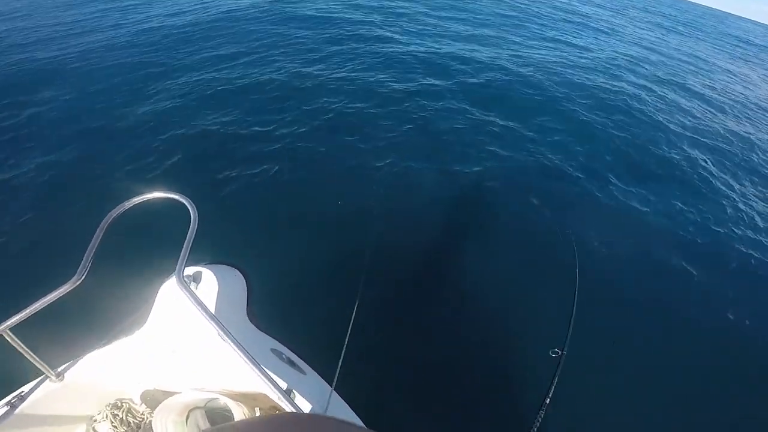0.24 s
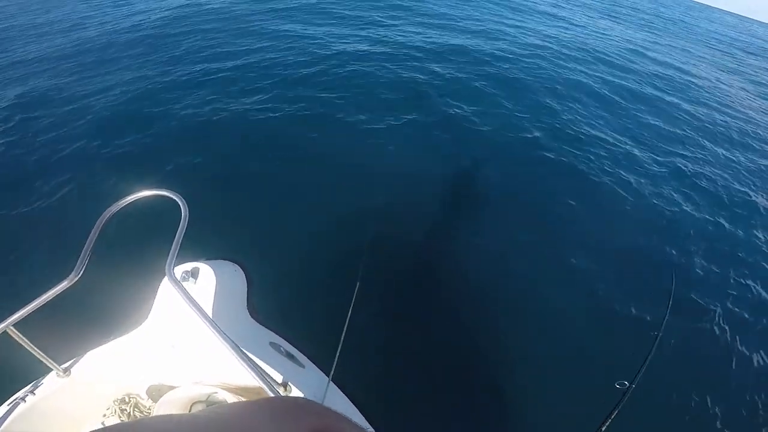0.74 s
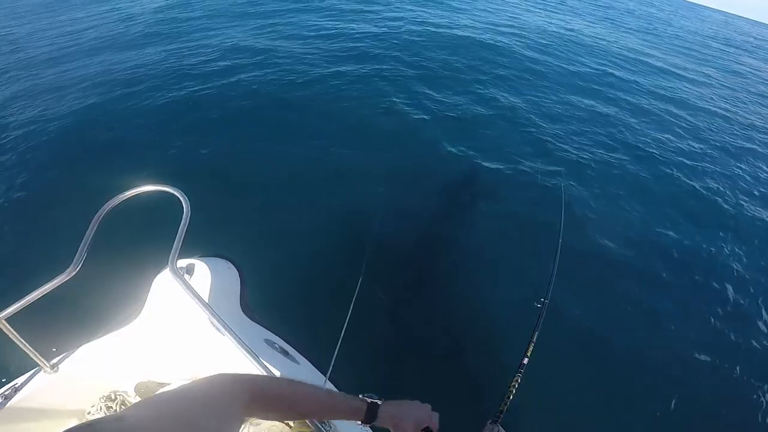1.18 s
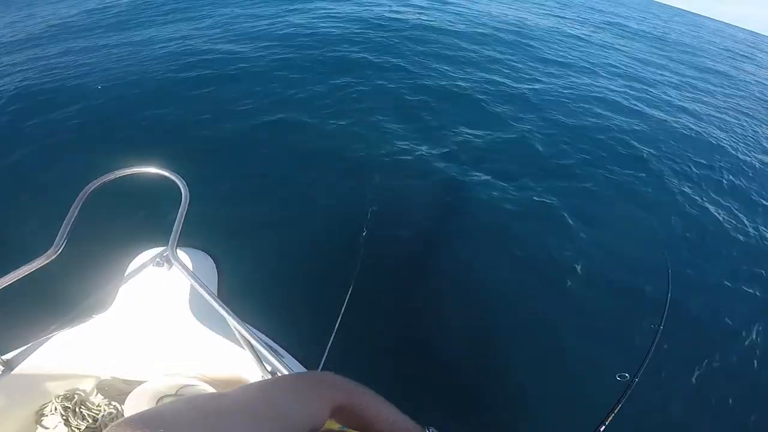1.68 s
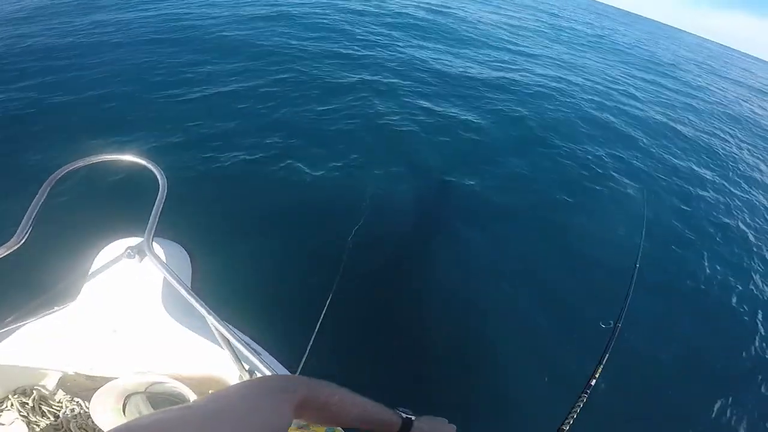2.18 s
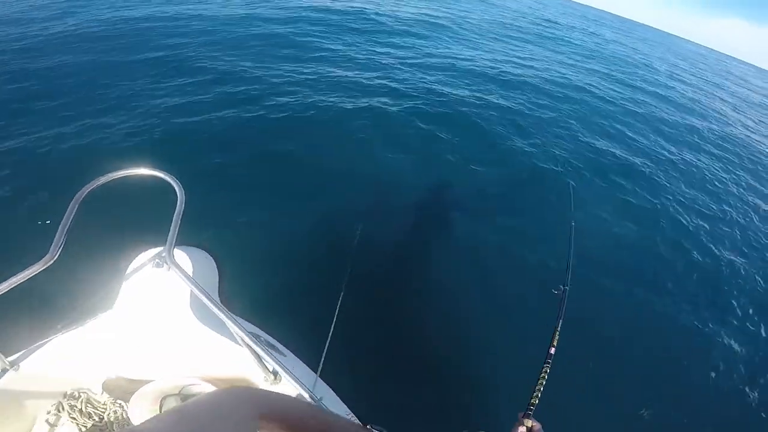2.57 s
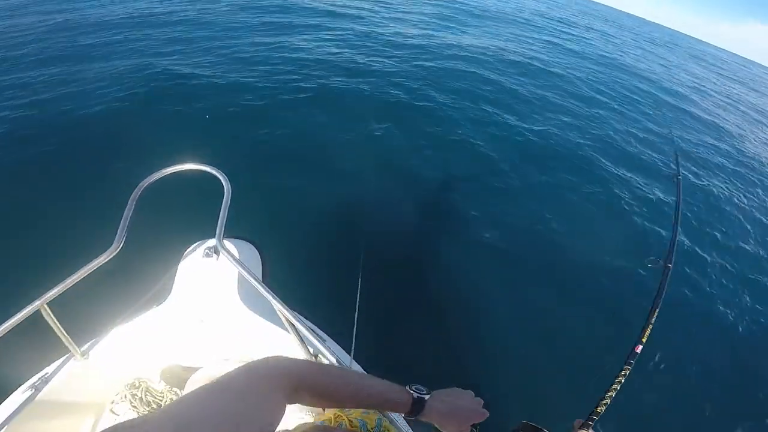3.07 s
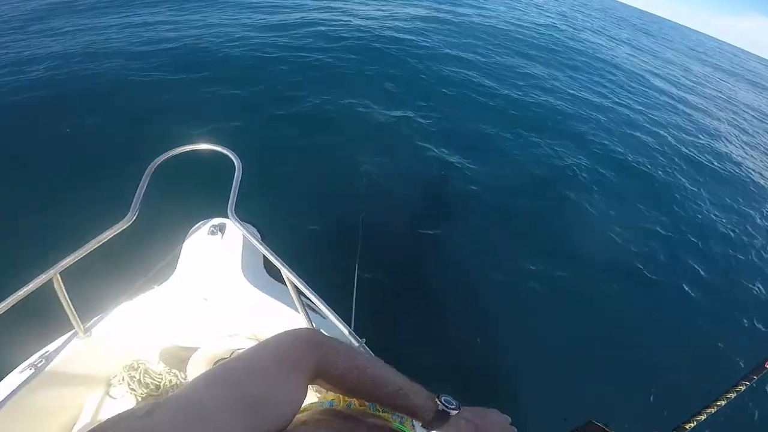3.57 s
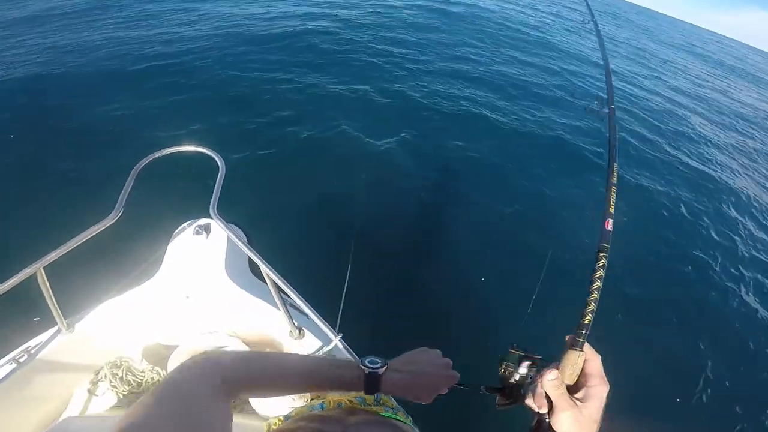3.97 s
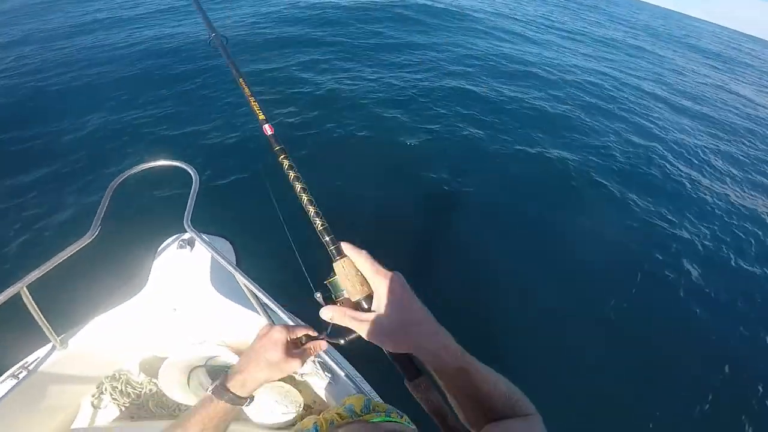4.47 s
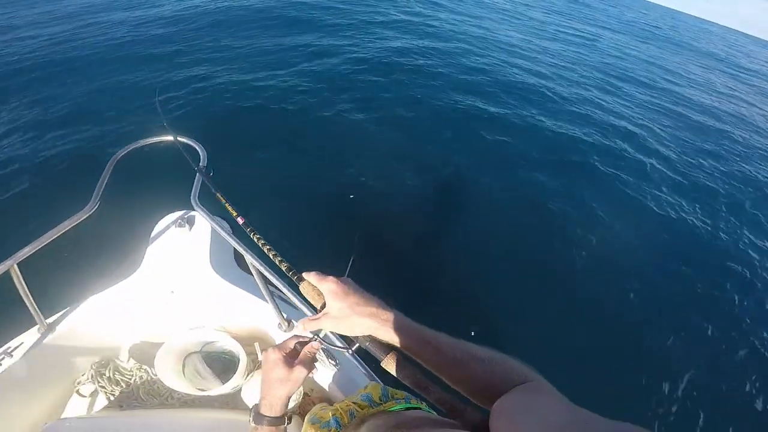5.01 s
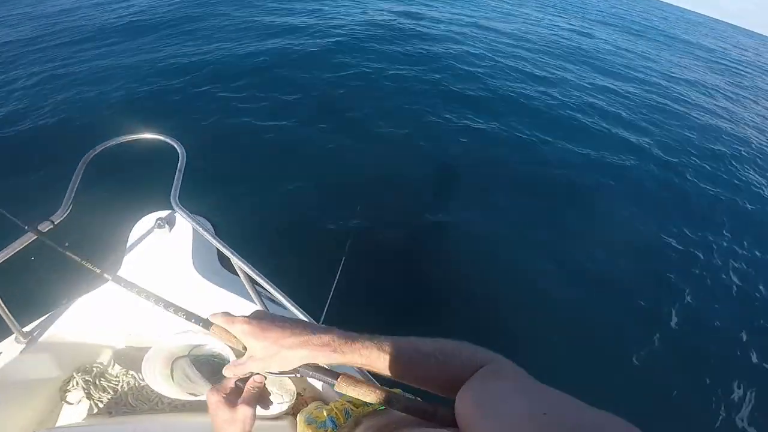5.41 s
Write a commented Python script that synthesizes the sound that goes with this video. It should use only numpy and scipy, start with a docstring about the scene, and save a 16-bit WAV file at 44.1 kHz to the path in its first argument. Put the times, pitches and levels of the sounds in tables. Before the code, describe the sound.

A body-worn microphone on a small boat in open air: a knock first, then raspy reel cranking, a pause with a rattle of knocks and a swelling slosh, more cranking, a quieter gap, and a loud slap with spray. Squealing turns and small metal clicks follow, then a soft watery thump and gusty rumble, and a last spurt of reeling. An even sea wash continues throughout.

```python
"""To the right a fishing reel is cranked in spurts: friction noise makes the rasp, narrow noise bands that follow
the line speed the whirr, and ones with a pitch set for each spurt the squeal; resonances of the rod colour the
rasp and ring, and a pawl ticks at every tooth. Tackle knocks on the deck as damped modes, and metal clicks are
short noise bursts. Waves slosh and slap under the hull of a small boat as ringing air pockets, with one burst of
spray. Behind lie the even wash of a calm sea, a low gusty rumble of filtered noise and a faint wavering hum."""
import sys
import numpy as np
from scipy import signal
from scipy.fft import rfft, irfft, next_fast_len
from scipy.io import wavfile

SR = 44100
rng = np.random.default_rng(int(sys.argv[2]) if len(sys.argv) > 2 else 0)


def transcribe(u):
    """Save the signal u as a 16-bit wav file named by the first command-line argument.

    u: samples, shape (n,) or (channels, n), limited to [-1, 1]; the rate is SR.
    q: integer samples, one column per channel.
    """
    v = np.clip(np.atleast_2d(u).T, -1, 1)
    q = np.round(v * 32767).astype(np.int16)
    wavfile.write(sys.argv[1], SR, q)


N = 249165
TIME = np.arange(N) / SR
EDGE_HZ = 14900  # upper band limit

# Spectrum of the wind rumble: (frequency [Hz], level [dB])
RUMBLE_COLOUR = [(3, -20), (9, 7), (15, 2.5), (22, -7.5), (32, -6.5), (50, -16), (75, -19), (130, -35.5),
                 (300, -50), (800, -101)]
BREEZE_DB = -33.5  # steady wind at the microphone
# Gusts above the breeze: (strongest at [s], length [s], level [dB])
GUSTS = [(0.083, 0.11, -31.5), (0.545, 0.15, -27), (1.98, 0.49, -29), (2.547, 0.6, -30), (3.152, 0.87, -30),
         (4.261, 0.62, -24.5), (4.53, 0.3, -26), (5.006, 0.29, -20.5), (5.27, 0.35, -24.5)]
HUM_HZ, HUM_DB = 105.1, -51  # centre of the wavering pitch and level

# Spectrum of the open water: (frequency [Hz], level [dB])
SEA_COLOUR = [(65, -20.5), (110, -12.5), (166, -16), (192, -14.5), (231, -15), (320, -19.5), (483, -16.5),
              (914, -19), (2350, -30.5), (3070, -30), (3480, -34), (6850, -32.5), (12400, -43),
              (15000, -60)]
# Left-right correlation of the open water: (frequency [Hz], correlation [-1 to 1])
SEA_CORRELATION = [(60, 0.76), (130, -0.61), (290, -0.23), (630, -0.93), (1380, -0.5), (3000, -0.051),
                   (6600, -0.12), (14000, 0.27)]
SEA_DB = -45.5

# Spectrum of the sloshing: (frequency [Hz], level [dB])
SLOSH_COLOUR = [(50, -43.5), (100, 1.5), (150, 1), (220, -5), (320, -11), (480, -18.5), (800, -34),
                (2000, -46.5), (6000, -107)]
LAP_DB, LAP_WAVER_DB, LAP_WAVER_HZ = -52, 2, 4.8  # water never rests along the hull
# Waves washing along the hull: (crest [s], level [dB], swelling [s], ebbing [s])
WAVES = [(.66, -57, .06, 0.18), (1.39, -34, 0.37, 0.73), (1.61, -29.5, 0.29, 0.33),
         (2.33, -37, 0.091, 0.14), (2.6, -42, 0.094, 0.25), (2.76, -35, 0.08, 0.12),
         (3.05, -48.5, 0.41, 0.74), (3.712, -29, 0.011, 0.16), (4.1, -43.5, 0.43, 0.26),
         (4.4, -43.5, 0.28, 0.45), (4.78, -44, 0.8, 0.57), (4.98, -34.5, 0.073, 0.21)]
WAVE_RANGE_DB = 20  # rise and fall of a wave within its swelling and ebbing times
CHURN_DB, CHURN_HZ = -20, 550  # a wave this strong would double the amplitude above this pitch
# Slaps that shut air pockets under the hull:
# (time [s], peak [dB], starting pitch [Hz], 60 dB decay time [s], glide [share of the pitch])
SLAPS = [(0.293, -26.5, 178, 0.027, 0.17), (.560, -42, 500, 0.079, 0.33), (0.646, -34, 162.5, 0.26, .37),
         (1.47, -32, 170, 0.072, .37), (1.521, -30, 205.3, 0.094, .37), (2.304, -27, 666, 0.021, 0.41),
         (2.314, -32, 176, 0.066, 0.56), (2.397, -38, 379, 0.066, 0.34), (2.593, -36, 293, 0.22, 0.6),
         (2.733, -32, 414, 0.021, 0.45), (2.766, -29, 189.8, 0.048, 0.44), (3.695, -25.5, 485, 0.024, 0.53),
         (3.7, -11.5, 191, 0.043, 0.34), (3.719, -29, 237, 0.088, 0.3), (3.783, -27, 445, 0.022, 0.46),
         (4.958, -27.5, 412.3, 0.045, -0.67), (4.971, -24.5, 260, 0.11, -0.44),
         (4.995, -19.5, 140.5, 0.12, -.12)]

SPRAY_AT_S, SPRAY_DB, SPRAY_RISE_S, SPRAY_T60_S = 3.697, -33, 0.0024, 0.19
# Spectrum of the spray: (frequency [Hz], level [dB])
SPRAY_COLOUR = [(800, -17), (2500, -5), (4500, 4), (6500, 7), (9000, -8), (12000, -9), (15000, -33)]

# Tackle knocking on the deck: (time [s], peak of the blow [dB], its pitch [Hz], its 60 dB decay time [s],
# crack relative to the blow [dB], deck ring relative to the blow [dB])
KNOCKS = [(0.0372, -11.5, 910, 0.004, -16, -20), (.297, -34, 1750, 0.0058, 1, -7),
          (.716, -23.5, 580, 0.0083, -9, -22), (1.411, -21.5, 1300, 0.0057, -9.5, -11.5),
          (1.523, -22.5, 1402, 0.004, -6, -12.5), (1.540, -24.5, 1098, 0.0064, -8, -14),
          (1.5526, -11, 1120, 0.0032, -19, -13.5), (1.5745, -11, 1140, 0.0089, -20, -29),
          (1.729, -32.5, 1760, 0.004, 0, -10), (3.044, -39.5, 701, 0.017, 4.5, -15),
          (4.928, -34.5, 1501, 0.0061, -3, -4), (4.958, -28, 1110, 0.0051, -4, -6),
          (4.977, -28, 1540, 0.025, -3, -3.5), (5.136, -38, 1500, 0.014, -3, -4)]
# Modes of the deck: (nominal frequency [Hz], level [dB], 60 dB decay time [s])
DECK_MODES = [(453, -2.5, 0.029), (840, 3, 0.011), (1200, -26, 0.015), (1704, 2, 0.029),
              (3930, -10, 0.0034), (4400, -2.5, 0.013)]
# Spectrum of the crack of a knock: (frequency [Hz], level [dB])
CRACK_COLOUR = [(300, -82), (1000, 18), (2500, 13), (4200, 6), (6500, 11.5), (9000, -11), (15000, -27)]

# Small metal clicks of the reel: (time [s], peak [dB])
CLICKS = [(1.353, -29.5), (2.903, -25.5), (3.639, -23.5), (3.918, -25), (4.010, -22.5), (4.0919, -19.5),
          (5.005, -28), (5.083, -22.5)]
# Spectrum of a click: (frequency [Hz], level [dB])
CLICK_COLOUR = [(800, -14), (2000, 2), (3500, 3), (5000, 12), (6400, 18), (7600, 14), (9500, 7.5),
                (12000, -12), (15000, -17)]

# Phase by which the left channel leads for sound from the right: (frequency [Hz], phase [rad])
LEFT_PHASE = [(100, -8.5), (400, 8), (700, -1.5), (1700, -5), (2700, -4.5), (4500, -7.5), (6000, -8.5),
              (9000, -9), (15000, -25.5)]

# Line speed as the pitch of its whirr: (time [s], pitch [Hz])
SPEED = [(0, 600), (.2, 600), (.36, 830), (.55, 520), (.66, 1400), (.76, 1900), (.95, 1450), (1.08, 2250),
         (1.3, 900), (1.7, 800), (1.88, 1750), (1.97, 2450), (2.08, 1900), (2.18, 1450), (2.27, 1950),
         (2.42, 1500), (2.55, 1700), (2.7, 1750), (2.9, 1000), (3.42, 720), (3.58, 1600), (3.68, 2000),
         (3.86, 1200), (4.08, 1750), (4.25, 1050), (4.39, 2050), (4.52, 1780), (4.66, 1720), (4.8, 950),
         (5.2, 720), (5.46, 800), (5.52, 1350), (5.56, 2350), (5.65, 2750)]
IDLE_HZ = 600  # whirr pitch taken as reference speed
WHIRR_CYCLES_PER_TOOTH = 16
# Spectrum of the pawl ticks: (frequency [Hz], level [dB])
PAWL_COLOUR = [(800, 2.5), (2000, -35.5), (3100, -3), (3800, -14.5), (5200, -3), (6400, 0.5), (7500, -6),
               (9000, -4), (12000, -32), (15000, -31)]
PAWL_DB, PAWL_DB_PER_OCTAVE = -51, -1.5  # rms level of the ticking; slope of level against speed

# Spurts of cranking: (start [s], strongest [s], end [s], rasp level before the gains in line() [dB],
# then relative to the rasp: hiss [dB], shrill ring [dB], squeal [dB], whirr [dB], rod ring [dB];
# squeal pitch [Hz])
SPURTS = [(0.582, 0.736, 0.95, -53, 5.4, -13, -6, -7, 1, 5800),
          (.74, .86, 1.04, -58.5, 7.3, -14, -1, -10, 1, 5797),
          (.98, 1.051, 1.284, -54, 10.2, -2.5, 1, -9, -5, 5450),
          (1.862, 1.937, 2.05, -48.5, 1.5, -5, -6.5, -5, -8, 5702),
          (1.748, 2.067, 2.25, -55, 1, -8, -4.5, -4, 7, 5800),
          (2.19, 2.236, 2.44, -53, 6.9, -5, 0, -9, -1, 5700),
          (2.269, 2.372, 2.56, -58, 3, -15, -7, -9, 8.5, 5715),
          (2.421, 2.54, 2.85, -52, 5, -11.5, -1.5, -5, 0.5, 5654),
          (2.6, 2.887, 3.05, -61.5, 12.4, -10, -8, -12, -18, 5983),
          (3.44, 3.535, 3.95, -56.5, 8.6, 4, 8.5, 4, -12, 5950),
          (3.52, 3.682, 3.95, -54, 10, -2, 2.5, 1, -5, 6400),
          (3.87, 4.058, 4.27, -51, 5.1, -5, -3, -7, -7, 6000),
          (4.22, 4.38, 4.6, -52, 9.9, -3.5, 2, 3.5, -5, 6310),
          (4.44, 4.6, 4.82, -53.5, 8, -8, 6, 3, -1, 5640),
          (4.6, 4.832, 5.05, -62, 6, -29, -6, -5, -10, 6080),
          (5.429, 5.622, 5.87, -54.5, 4, -1.5, 9.5, 6, -10, 5727)]
LOUDNESS_CURVE = 0.87  # power of the arch of a spurt: lower is flatter
# The line creeps on between spurts: rasp before the gains in line(), hiss and whirr relative to it
IDLE_DB, IDLE_HISS_DB, IDLE_WHIRR_DB = -62, -4, -4.5
# Friction noise that drives the rod: (frequency [Hz], level [dB])
RASP_COLOUR = [(500, -24), (1200, 3.5), (1800, 8.5), (2400, -2.5), (4000, 1.5), (15000, 3)]
# Broad response of line and rod: (frequency [Hz], level [dB])
LINE_COLOUR = [(400, -48), (900, -1), (1500, -1.5), (2600, -8.5), (3400, -12.5), (5600, -6.5), (7300, -24),
               (8200, -16.5), (11000, -23), (15000, -67)]
# Resonances of the rod: (frequency [Hz], width [Hz], level [dB])
ROD_RESONANCES = [(1852, 130, 3.5), (4030, 650, -7.5), (4800, 410, -6), (5500, 620, -6.5), (6570, 440, -7),
                  (7250, 630, -6), (8900, 540, -15)]
SHRILL_HZ, SHRILL_WIDTH_HZ = 2500, 860
RING_HZ, RING_WIDTH_HZ, RING_FLUTTER_DB = 1880, 130, 2.5
# Harmonics of the whirr, from the first: level [dB]
WHIRR_HARMONICS_DB = [0, -5]
# Spectral envelope of the whirr: (frequency [Hz], level [dB])
WHIRR_COLOUR = [(500, -8), (900, -1), (1500, -2), (1900, 0), (2900, 0), (3400, -15), (6000, -20)]
# Strands of the squeal: (share of its pitch, level [dB])
STRANDS = [(.8, -11), (1, 0)]
# Chirps where the line catches: (loudest at [s], nominal peak [dB], length [s], mean pitch [Hz])
CHIRPS = [(.097, -32, .013, 1850), (.85, -39, .024, 1860), (1.894, -35, .018, 1850), (2.04, -35, .04, 1860),
          (2.1, -36, .04, 1860), (2.528, -35.5, .014, 1760), (2.558, -35, .018, 1820),
          (4.351, -33, .012, 1880), (4.429, -34, .02, 1900), (4.45, -30.5, .026, 1860),
          (4.492, -31.5, .024, 1870), (4.648, -34, .044, 1780)]


def amp(db):
    """Level definition: 20 dB for each factor of ten in amplitude."""
    return 10 ** (np.asarray(db) / 20)


def unit(x):
    """Normalization: scales to rms 1."""
    return x / np.sqrt(np.mean(x ** 2) + 1e-20)


def read(points, hz):
    """Interpolation on a log-frequency axis."""
    f, value = np.transpose(points)
    return np.interp(np.log(hz + 1), np.log(f + 1), value)


def bins(x):
    """Fourier analysis: the frequencies in the spectrum of x."""
    return np.fft.rfftfreq(x.shape[-1], 1 / SR)


def colour(x, points, size=4096):
    """Minimum-phase filtering: a causal filter whose phase follows from its log gain."""
    log_gain = np.log(amp(read(points, abs(np.fft.fftfreq(size, 1 / SR)))))
    taps = np.fft.ifft(np.exp(np.conj(signal.hilbert(log_gain)))).real[:size // 2]
    taps = taps.reshape((1,) * (x.ndim - 1) + (-1,))
    return signal.fftconvolve(x, taps, axes=-1)[..., :x.shape[-1]]


def above(x, edge_hz):
    """High-pass filtering: the part of x above an edge, without phase shift."""
    return irfft(rfft(x) / (1 + (edge_hz / (bins(x) + 1)) ** 8), N)


def resonance(hz, centre, width):
    """Resonance: gain that peaks at 1 on the centre and falls steeply to either side."""
    return 1 / (1 + (2 * (hz - centre) / width) ** 2)


def drift(hz):
    """Band-limited random fluctuation: low-passed noise of rms 1, up to about the given rate."""
    noise = rng.standard_normal(next_fast_len(N))
    lowpass = np.exp(-(bins(noise) / hz) ** 2)
    return unit(irfft(rfft(noise) * lowpass, len(noise))[:N])


def fuzzy(turns, fuzz_hz):
    """Modulation: complex noise shifts a narrow random band to a moving pitch."""
    band = drift(fuzz_hz) + 1j * drift(fuzz_hz)
    return (band * np.exp(2j * np.pi * turns)).real


def arch(start, top, end):
    """Envelope: rises from 0 to 1 and falls back along quarter sines."""
    return np.sin(np.pi / 2 * np.interp(TIME, [start, top, end], [0, 1, 0]))


def together(parts):
    """Incoherent superposition: overlapping parts add by power."""
    return np.sqrt(sum(part ** 2 for part in parts))


def add(mix, s, sound):
    """Linear superposition: lays a sound into the mix at time s."""
    part = mix[..., max(round(s * SR), 0):][..., :sound.shape[-1]]
    part += sound[..., :part.shape[-1]]


def diffuse(pair):
    """Diffuse field: two unrelated signals are mixed to a set correlation at each frequency."""
    a, b = rfft(pair)
    same = np.clip(read(SEA_CORRELATION, bins(pair)), -1, 1)
    return irfft(np.array([a, same * a + np.sqrt(1 - same ** 2) * b]), N)


def from_right(x, shade_db):
    """Directional hearing: the left channel is shifted in phase by frequency and made weaker."""
    left = irfft(rfft(x) * np.exp(1j * read(LEFT_PHASE, bins(x))), N)
    return np.array([amp(shade_db) * left, x])


def cockpit(x, t60, wet_db):
    """Early reflection: sparse decaying echoes of the right channel, as off deck and rails, reach both."""
    t = np.arange(SR // 4) / SR
    taps = rng.standard_normal((2, len(t))) * (rng.random((2, len(t))) < .1)
    taps *= amp(-60 * t / t60) * (t > .002)
    taps /= np.linalg.norm(taps, axis=1, keepdims=True)
    return x + amp(wet_db) * signal.fftconvolve(x[1:], taps, axes=1)[:, :N]


def wind_strength():
    """Turbulence envelope: smooth gusts add by power to a steady breeze."""
    gusts = [amp(db) * arch(s - length / 2, s, s + length / 2) for s, length, db in GUSTS]
    return together([amp(BREEZE_DB)] + gusts)


def rumble(apart_db=-14, left_db=-1.5):
    """Low-frequency coherence: wind noise nearly alike in both channels, and a frequency-modulated hum."""
    noises = rng.standard_normal((2, N))
    common, apart = (unit(irfft(rfft(z) * amp(read(RUMBLE_COLOUR, bins(z))), N)) for z in noises)
    air = wind_strength() * (common + amp(apart_db) * np.array([apart, -apart]))
    hum_level = amp(HUM_DB + 3.3 * drift(5.6))
    hum = hum_level * unit(np.sin(2 * np.pi * np.cumsum(HUM_HZ + 3 * drift(6.3)) / SR))
    return (air + hum) * amp([[left_db / 2], [-left_db / 2]])


def sea(left_db=-1.5, flutter_db=1.0):
    """Diffuse radiation: the even wash of open water as filtered noise with a slight flutter."""
    wash = unit(colour(diffuse(rng.standard_normal((2, N))), SEA_COLOUR))
    return wash * amp(SEA_DB + flutter_db * drift(29.0)) * amp([[left_db], [0]])


def wave_strength():
    """Exponential growth and decay: each wave swells to a crest and ebbs over wavering lapping."""
    lapping = amp(LAP_DB + LAP_WAVER_DB * drift(LAP_WAVER_HZ))
    waves = []
    for s, db, swell, ebb in WAVES:
        distance = np.maximum((s - TIME) / swell, (TIME - s) / ebb)
        waves.append(amp(db - WAVE_RANGE_DB * distance))
    return together([lapping] + waves)


def pocket(hz, t60, rise, onset):
    """Bubble resonance: trapped air rings, rising near the surface or falling as the pocket widens."""
    t = np.arange(SR // 4) / SR
    pitch = hz * (1 + rise * np.minimum(t / t60, 1))
    ring = np.sin(2 * np.pi * np.cumsum(pitch) / SR) * amp(-60 * t / t60) * (1 - np.exp(-t / onset))
    return ring / abs(ring).max()


def slosh(apart_db=-3.0, pockets_per_s=2000, count=24):
    """Random superposition: crowds of air pockets gurgle; strong waves churn up more of the small ones."""
    crowd = np.zeros((2, N))
    for hz in np.geomspace(90, 1400, count):
        births = (rng.random((2, N)) < pockets_per_s / count / SR) * rng.standard_normal((2, N))
        ring = pocket(hz, 9 / hz, rise=0.077, onset=0.0012)
        ring = ring[None] / np.linalg.norm(ring)
        crowd += signal.fftconvolve(births, ring, axes=1)[:, :N] * np.sqrt(hz)
    common, apart = (unit(z) for z in colour(crowd, SLOSH_COLOUR))
    pair = common + amp(apart_db) * np.array([apart, -apart])
    strength = wave_strength()
    churned = strength / amp(CHURN_DB) * above(pair, CHURN_HZ)
    return strength * (pair + churned)


def slaps(left_db=-1.5):
    """Cavity resonance: single hollow slaps shut air pockets under the bow."""
    out = np.zeros(N)
    for s, db, hz, t60, glide in SLAPS:
        add(out, s, amp(db) * pocket(hz, t60, rise=glide, onset=0.00058))
    return cockpit(out * amp([[left_db], [0]]), t60=.075, wet_db=-7)


def spray(drops_per_s=5000, left_db=-2):
    """Impulsive noise: the hardest slap throws up a burst of fine drops that fades quickly."""
    out, t = np.zeros((2, N)), np.arange(SR // 4) / SR
    drops = rng.standard_normal((2, len(t))) * (rng.random((2, len(t))) < drops_per_s / SR)
    envelope = (1 - np.exp(-t / SPRAY_RISE_S)) * amp(SPRAY_DB - 60 * t / SPRAY_T60_S)
    burst = unit(colour(drops, SPRAY_COLOUR)) * envelope
    add(out, SPRAY_AT_S, burst * amp([[left_db], [0]]))
    return out


def deck_ring(t):
    """Modal vibration: damped deck modes, each with random detuning and phase."""
    ring = np.zeros(len(t))
    for hz, db, t60 in DECK_MODES:
        turns = hz * rng.uniform(0.79, 1.145) * t + rng.random()
        ring += amp(db - 60 * t / t60) * np.sin(2 * np.pi * turns)
    return ring


def knocks(crack_t60=0.052):
    """Impact excitation: a short damped blow, the ring of the deck and a bright crack."""
    out, t = np.zeros(N), np.arange(SR // 8) / SR
    for s, db, hz, blow_t60, crack_db, ring_db in KNOCKS:
        blow = np.sin(2 * np.pi * hz * t) * amp(-60 * t / blow_t60) * (1 - np.exp(-10 * t / blow_t60))
        blow /= abs(blow).max()
        ring = deck_ring(t)
        crack = colour(rng.standard_normal(len(t)) * amp(-60 * t / crack_t60), CRACK_COLOUR)
        crack /= abs(crack).max()
        add(out, s, amp(db) * (blow + amp(ring_db) * ring + amp(crack_db) * crack))
    return cockpit(from_right(out, shade_db=-14), t60=0.05, wet_db=-12)


def click(spectrum, t60, onset):
    """Transient excitation: one dry metal tick of peak 1 from decaying, filtered noise."""
    t = np.arange(SR // 25) / SR
    envelope = amp(-60 * t / t60) * (1 - np.exp(-t / onset))
    tick = colour(rng.standard_normal(len(t)) * envelope, spectrum)
    return tick / abs(tick).max()


def clicks():
    """Impact between metal parts: clicks as the rod and reel are handled close by."""
    out = np.zeros(N)
    for s, db in CLICKS:
        add(out, s, amp(db) * click(CLICK_COLOUR, t60=0.0076, onset=0.00023))
    return cockpit(from_right(out, shade_db=-2.5), t60=0.06, wet_db=-10)


def whirr_pitch():
    """Kinematics: the speed of the line expressed as a pitch."""
    return np.interp(TIME, *np.transpose(SPEED))


def by_speed(db_per_octave):
    """Power law: a gain that follows the speed of the line relative to idle."""
    return amp(db_per_octave * np.log2(whirr_pitch() / IDLE_HZ))


def reel(ride_s=.0005, uneven_db=0.0):
    """Ratchet excitation: the pawl rides up each tooth and drops, a soft, quick ticking."""
    out, t = np.zeros(N), np.arange(-SR // 100, SR // 50) / SR
    teeth_passed = np.floor(np.cumsum(whirr_pitch() / WHIRR_CYCLES_PER_TOOTH) / SR)
    for at in np.flatnonzero(np.diff(teeth_passed)):
        scrape = rng.standard_normal(len(t)) / np.cosh(t / ride_s)
        add(out, at / SR, amp(uneven_db * rng.standard_normal()) * scrape)
    ticks = amp(PAWL_DB) * unit(colour(out * by_speed(PAWL_DB_PER_OCTAVE), PAWL_COLOUR))
    return cockpit(from_right(ticks, shade_db=-7), t60=.025, wet_db=-8)


def line_strength():
    """Common envelope: rasp, hiss, shrill ring, squeal, whirr and rod ring swell with each spurt."""
    idle_shares = np.array([[1], [amp(IDLE_HISS_DB)], [0], [0], [amp(IDLE_WHIRR_DB)], [0]])
    gains = [amp(IDLE_DB) * idle_shares]
    for start, top, end, db, *shares_db, _ in SPURTS:
        swell = arch(start, top, end) ** LOUDNESS_CURVE
        gains.append(amp(db) * np.outer(amp([0, *shares_db]), swell))
    return together(gains)


def line_whirr(fuzz_hz=150, jerk=.035, catch_db=3):
    """Harmonic series: fuzzy harmonics follow the line, which runs in small jerks."""
    turns = np.cumsum(whirr_pitch() * (1 + jerk * drift(39.15))) / SR
    harmonics = np.zeros(N)
    for k, db in enumerate(WHIRR_HARMONICS_DB, 1):
        harmonics += amp(db + catch_db * drift(27)) * fuzzy(k * turns, k * fuzz_hz)
    return unit(irfft(rfft(harmonics) * amp(read(WHIRR_COLOUR, bins(TIME))), N))


def squeal(fuzz_hz=420, wander=.025, surge_db=4):
    """Friction vibration: the line squeals at a pitch set for each spurt; strands wander and surge apart."""
    weights = np.array([arch(start, top, end) ** 2 + 1e-6 for start, top, end, *_ in SPURTS])
    hz = np.array([row[-1] for row in SPURTS]) @ weights / weights.sum(0)
    strands = np.zeros(N)
    for share, db in STRANDS:
        level = amp(db + surge_db * np.tanh(drift(26)))
        turns = np.cumsum(share * hz * (1 + wander * drift(21.93))) / SR
        strands += level * fuzzy(turns, fuzz_hz)
    return unit(strands)


def rod_ring():
    """Driven resonance: noise excites the main resonance of the rod, whose level flutters."""
    ring = irfft(rfft(rng.standard_normal(N)) * resonance(bins(TIME), RING_HZ, RING_WIDTH_HZ), N)
    return unit(ring * amp(RING_FLUTTER_DB * drift(78)))


def chirps(jerk=.025, rough_db=2):
    """Transient resonance: where the line catches, the rod swells and fades in a short, rough chirp."""
    out, waver = np.zeros(N), 1 + jerk * drift(150)
    for s, db, length, hz in CHIRPS:
        size = round(length * SR)
        pitch = hz * waver[round(s * SR):][:size]
        tone = np.sin(2 * np.pi * np.cumsum(pitch) / SR)
        add(out, s - length / 2, amp(db) * np.hanning(size) * tone)
    return out * amp(rough_db * drift(200))


def line(gain_db=3.5, treble_db=-1.5, hiss_hz=3500, rasp_db=2.3, surge_db=1.5):
    """Friction and resonance: line over the guides drives the rod to rasp and hiss, and whirrs and squeals."""
    whirr, hz = line_whirr(), bins(TIME)
    drive = rfft(colour(rng.standard_normal(N), RASP_COLOUR) * amp(rasp_db * drift(75)))
    modes = [amp(db) * resonance(hz, f, width) for f, width, db in ROD_RESONANCES]
    body = together([amp(read(LINE_COLOUR, hz))] + modes)
    rasp = unit(irfft(drive * body, N))
    hiss = above(rasp, hiss_hz)
    shrill = unit(irfft(drive * resonance(hz, SHRILL_HZ, SHRILL_WIDTH_HZ), N))
    layers = np.array([rasp - hiss, hiss, shrill, squeal(), whirr, rod_ring()])
    low, hiss, shrill, thin, whirr, ring = amp(gain_db) * layers * line_strength()
    treble = amp(treble_db) * (hiss * amp(surge_db * drift(14)) + thin)
    # the treble is scattered more strongly than the rest
    scattered = cockpit(from_right(treble, shade_db=-15.0), t60=0.0094, wet_db=-2.5)
    main = from_right(low + shrill + whirr + ring + chirps(), shade_db=-4.0)
    return cockpit(main, t60=0.027, wet_db=-7.5) + scattered


def scene():
    """Linear superposition of all sources."""
    return rumble() + sea() + slosh() + slaps() + spray() + knocks() + clicks() + reel() + line()


def record(dry):
    """Band limitation: a linear-phase low-pass filter at EDGE_HZ."""
    lowpass = signal.firwin(511, EDGE_HZ, window=("kaiser", 9), fs=SR)
    return signal.oaconvolve(dry, lowpass[None], "same")


dry = scene()
out = record(dry)
transcribe(out)
```